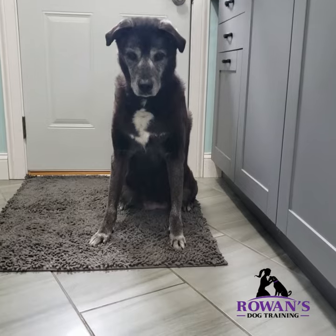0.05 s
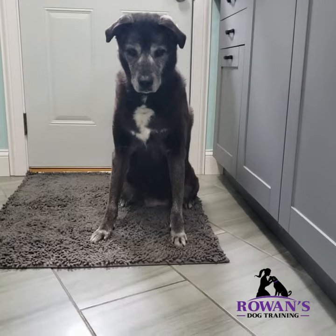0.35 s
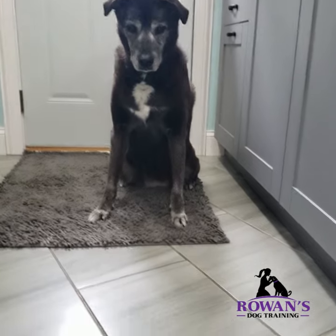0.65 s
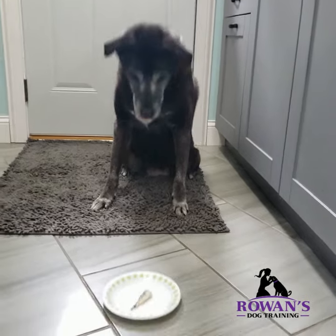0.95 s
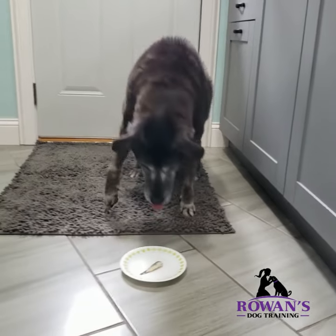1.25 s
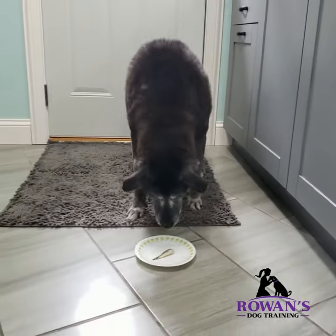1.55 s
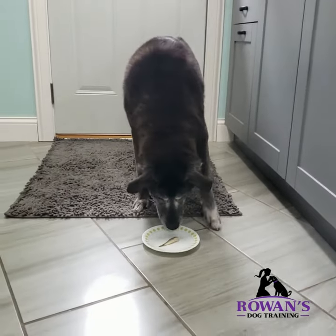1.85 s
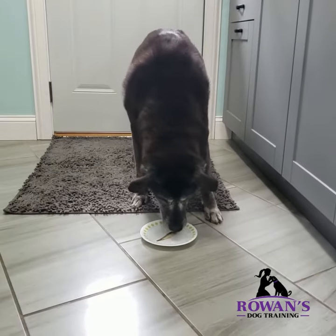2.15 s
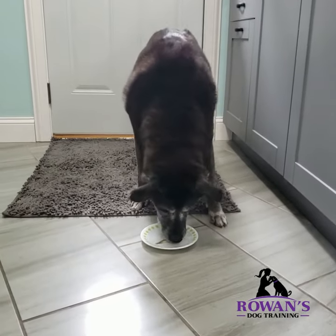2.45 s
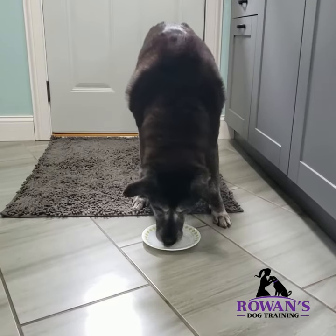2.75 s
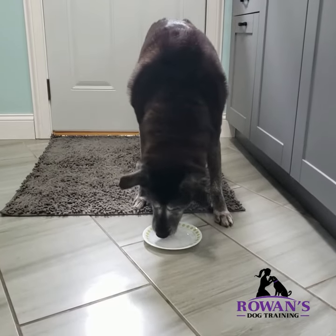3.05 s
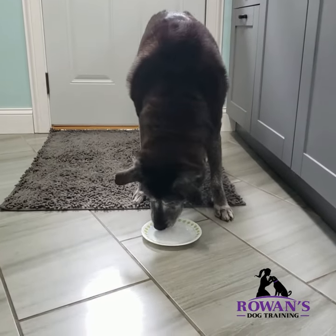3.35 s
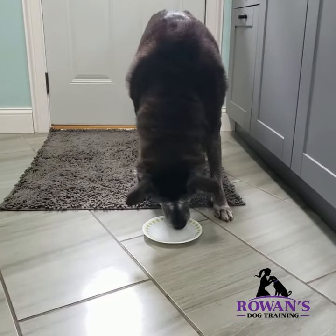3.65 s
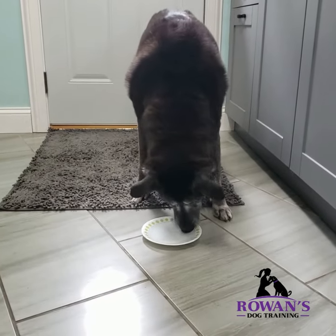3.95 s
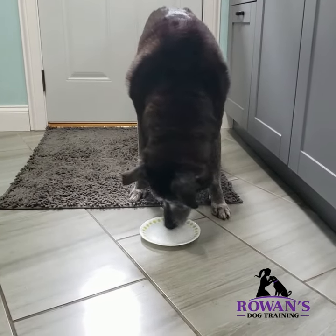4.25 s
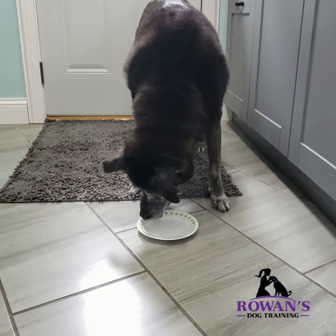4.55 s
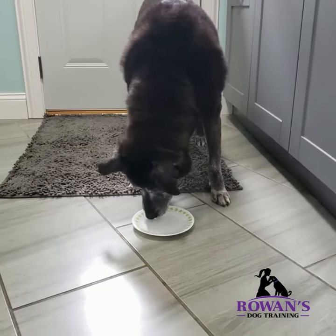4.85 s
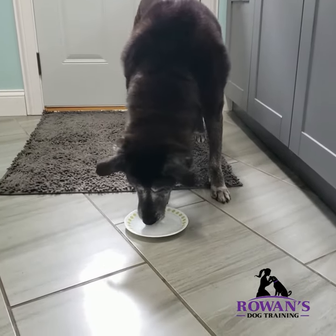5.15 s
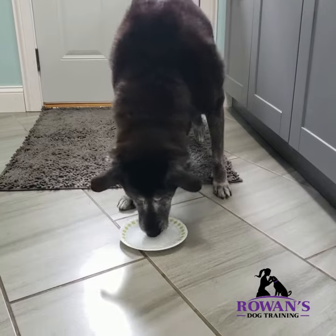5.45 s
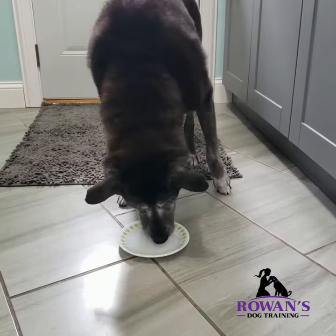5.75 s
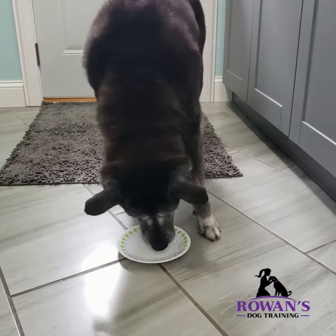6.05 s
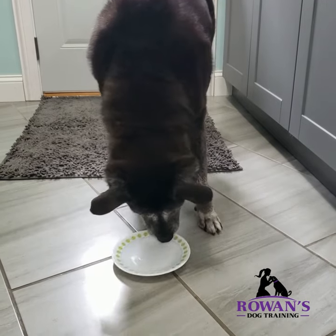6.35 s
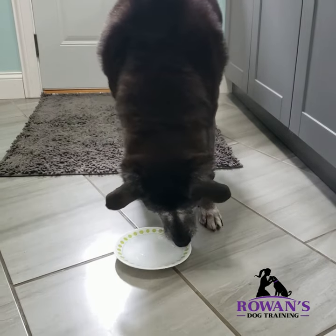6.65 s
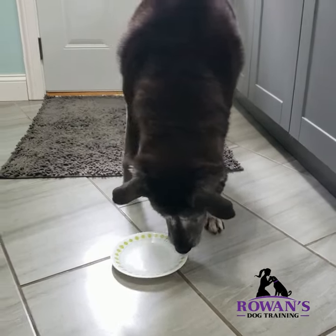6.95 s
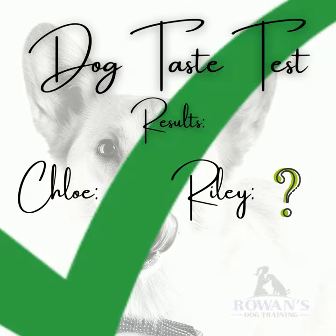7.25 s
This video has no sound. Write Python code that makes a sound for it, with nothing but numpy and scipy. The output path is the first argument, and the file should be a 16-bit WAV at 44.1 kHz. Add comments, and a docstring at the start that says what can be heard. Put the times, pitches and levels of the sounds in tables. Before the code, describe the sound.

A plate scrapes over tiles, rattles and rings briefly, followed by a dog quietly smacking and licking it until it knocks.

```python
"""A gritty scrape swells as a small, hard plate slides over a tiled kitchen floor. Stick-slip friction
makes it chatter; it strikes a grout line, rattles and rings in its modes until a dog's muzzle damps it.
The dog takes the food with soft smacks of its resonant mouth, shifts its paws and licks the plate,
shoving it along in short scrapes until it knocks. The hard room reverberates over a low rumble,
and the sound stops dead just after the last knock."""
import sys
import numpy as np
from scipy import signal
from scipy.fft import rfft, irfft, next_fast_len
from scipy.io import wavfile
from scipy.ndimage import uniform_filter1d, map_coordinates

SR = 44100
rng = np.random.default_rng(int(sys.argv[2]) if len(sys.argv) > 2 else 0)


def int16_out(signal):
    """Quantize to a 16-bit WAV file."""
    q = np.round(np.clip(np.atleast_2d(signal).T, -1, 1) * 32767)
    wavfile.write(sys.argv[1], SR, q.astype(np.int16))


N = 321048

# resonances of the plate against the floor: f/Hz, bandwidth/Hz, level/dB
CONTACT_RESONANCES = [(1330, 400, -6.5), (1610, 220, -3.5), (2093, 220, 2.5), (3170, 250, 4),
                      (3820, 270, -4.5), (5800, 400, -10)]
# spectra of the bright grit and of the dull clack: f/Hz, relative level/dB
GRIT_SPECTRUM = [(1500, -39), (4000, -16), (6000, -2.5), (7500, -0.5), (10000, -6.5), (12500, -1.5),
                 (16000, -2)]
CLACK_SPECTRUM = [(80, -32), (300, -18.5), (450, -13.5), (800, -18), (1500, -1), (2500, -15), (3800, -11),
                  (7000, -18.5), (16000, -52)]


def slide():
    """Sliding friction: hiss and floor drone grow as powers of the grinding, more slowly than it does."""
    reference_db = -34
    force = shove() / amp(reference_db)
    hiss, drone = amp(-1) * force ** 0.89, amp(-8) * force ** 0.57
    gain = amp(reference_db + 1.7 * wobble(70))
    return gain * friction(force, hiss, drone, rate=4000, spread_db=4.5)


def shove():
    """Amplitude envelope of the grinding while the plate slides."""
    grinding = [(.376, -73.5), (.47, -59.5), (.55, -40.5), (.64, -32.5), (.72, -40.5), (.84, -41.5),
                (.87, -30), (.97, -34), (1.005, -53), (1.085, -55.5)]  # course of the shove: t/s, level/dB
    times, db = np.transpose(grinding)
    t = clock()
    return (t > times[0]) * (t < times[-1]) * amp(np.interp(t, times, db))


def friction(scrape, hiss, drone, rate, spread_db):
    """Roughness noise: grit under the foot ring excites the plate, hisses and drones in the floor."""
    floor_spectrum = [(60, -36), (150, -10), (300, -8), (430, 0.5), (620, -8.5), (820, -2.5), (1100, -15),
                      (1800, -33.5), (5000, -77.5)]  # muffled rub in the floor: f/Hz, relative level/dB
    grit = grains(rate, spread_db)
    grind = unit(resonated(grit, CONTACT_RESONANCES) + amp(-3.5) * coloured(grit, CLACK_SPECTRUM))
    bright = coloured(grains(rate, spread_db), GRIT_SPECTRUM)
    muffled = coloured(grains(rate, spread_db), floor_spectrum)
    return scrape * grind + hiss * bright + drone * muffled


def chatter():
    """Stick-slip: at speed the foot ring slips unevenly and ever faster, and the plate squeals."""
    squeal_bands = [(1390, 560, 3.5), (1630, 430, 1), (2298, 630, -12.5), (3284, 150, 5), (5710, 150, -9),
                    (6750, 190, -5.5)]  # resonances that squeal: f/Hz, bandwidth/Hz, level/dB
    start_s, hold_s = .688, .148
    slip_hz = 72 + 260 * np.clip(clock() - start_s, 0, hold_s)
    slip_phase = np.cumsum(slip_hz * np.exp(0.33 * wobble(70))) / SR % 1
    slips = amp(-14 * slip_phase) * grains(9000, spread_db=2.0)
    squeal = np.zeros(N)
    for hz, width, db in squeal_bands:
        band = [(hz, width, 0)]
        squeal += amp(db) * resonated(resonated(slips, band), band)
    return amp(-26) * swell(start_s, hold_s, attack=.013, release=.012) * unit(squeal)


def knocks():
    """Impact excitation: each contact clacks and rings the modes anew; the rim cracks and rings most."""
    # plate knocks on tile, and one click of the dog's teeth: t/s, level/dB, contact (0 flat, 1 bare rim)
    impacts = [(.603, -32.5, 0.42), (.699, -23.5, 0.63), (.715, -19, 0.38), (0.8314, -29, 0.79),
               (.8527, -12.5, 0.86), (.8637, -13, 0.89), (0.8734, -13, 0.62), (.9085, -13, 0.4),
               (.92, -11, 0.59), (.93, -13.5, .1), (.949, -20.5, 0.48), (.959, -6.5, 0.18), (.978, -20, .5),
               (1.043, -14.5, .35), (1.058, -25.5, .4), (3.854, -37, 0), (6.293, -29, 0.098),
               (6.35, -27.5, 0), (6.886, -14.5, 0.11), (6.899, -33, .4), (6.934, -31, .3)]
    plate_modes = [(420.4, -22, 1.1), (591.5, -18.5, 0.43), (1240, -21, .7), (1649, -12, 0.37),
                   (2012, -1, 0.3), (2036, -13, 1.7), (2050, -6.5, .1), (3020, -8.5, 0.23),
                   (3140, -2, 0.13), (3290, -5, 0.079), (3627, -6, 0.073), (5710, -9.5, 0.15),
                   (7500, -5, 0.068), (8190, -10, 0.14), (9710, -15.5, 0.18), (12840, -10, 0.056),
                   (12870, -10, 0.062), (15770, -15.5, .06)]  # free vibration of the plate: f/Hz, level/dB, T60/s
    settle_s, rattle_db_per_s = 1.052, 51.5  # until the plate settles, rattling drains its ring
    muzzle_s, muzzle_db_per_s = 1.545, 90  # the muzzle lands and damps what still rings
    out, t = np.zeros(N), clock(2 * SR)
    short = t[:SR // 20]
    modes = np.array([amp(db) * decay(t, t60) * np.sin(2 * np.pi * hz * t) for hz, db, t60 in plate_modes])
    for start, db, rim in impacts:
        body_noise, clack_noise, crack_noise = rng.standard_normal((3, len(short)))
        body = resonated(body_noise, CONTACT_RESONANCES)
        clack = unit(body + amp(-4) * coloured(clack_noise, CLACK_SPECTRUM)) * decay(short, t60=0.021)
        crack = amp(-17 + 13.5 * rim) * coloured(crack_noise, GRIT_SPECTRUM) * decay(short, t60=.04)
        add(out, start, amp(db) * (clack + crack) * onset(short, tau=0.0002))
        ring = amp(-25 + 23 * rim + 2.4 * rng.standard_normal(len(modes))) @ modes
        damped_db = (start < muzzle_s) * muzzle_db_per_s * np.maximum(start + t - muzzle_s, 0)
        drained_db = rattle_db_per_s * np.minimum(t, max(settle_s - start, 0))
        add(out, start, amp(db - drained_db - damped_db) * ring)
    return out


def licks():
    """Forced vibration: the tongue drags the plate a little, and the friction keeps it humming."""
    hiss, scrape = strokes()
    rubbing = amp(2.36 * wobble(80)) * friction(scrape, hiss, drone=scrape, rate=3000, spread_db=1.5)
    hum = resonated(rubbing, [(1250, 2.6, 1.0), (1950, 2.0, -5.0)]) * np.std(rubbing)
    return shifting_colour(rubbing, depth_db=3.5) + amp(-24.0) * hum


def strokes():
    """Envelopes of the tongue's wet hiss and the plate's scrape: each stroke swells, sags and lets go."""
    # strokes of the tongue: t/s, rise/s, length/s, hiss level/dB, scrape relative to hiss/dB
    tongue_strokes = [(2.665, .02, .09, -78.5, -6.5), (3.314, 0.052, 0.16, -64.5, -1),
                      (3.602, 0.014, 0.048, -49, -2.5), (3.71, .02, 0.21, -57, -2),
                      (4.019, 0.024, .11, -53, -0.5), (4.215, .03, 0.077, -65, 2.5),
                      (4.297, 0.014, 0.15, -54, -2), (4.717, 0.044, 0.095, -55, -5.5),
                      (4.879, 0.052, .1, -48, 0), (4.983, 0.072, 0.19, -51, -3.5),
                      (5.297, 0.021, 0.073, -58.5, -6), (5.373, 0.018, 0.225, -45, 0),
                      (5.799, 0.046, 0.17, -43.5, -0.5), (6.081, .01, 0.044, -60, -3.5),
                      (6.2, 0.062, .2, -51, 8), (6.687, 0.013, 0.025, -49.5, 5),
                      (6.887, .01, 0.054, -43.5, 4.5)]
    hiss, scrape = np.zeros((2, N))
    for start, rise, length, db, drag_db in tongue_strokes:
        sag_db = 27.5 * np.clip(clock() - start, 0, 1)
        stroke = amp(db - sag_db) * swell(start, length, rise, release=0.01)
        hiss += stroke
        scrape += amp(drag_db) * stroke
    return hiss, scrape


def smacks():
    """Cavity resonance: wet lips part and ring the mouth, whose pitch glides as the jaw moves."""
    lip_pops = [(2.679, -47, 859, 2.5), (2.705, -58, 726, 6), (2.811, -64, 1410, 7), (3.1, -62, 1400, 4.5),
                (3.418, -37.5, 680, -2), (3.46, -52, 805, 4), (3.854, -37.5, 1650, -3),
                (3.862, -38.5, 736, 2), (3.905, -47, 810, -9), (3.931, -43, 847, 4), (4.251, -42, 590, -2),
                (4.315, -46, 755, 5), (4.325, -37.5, 505, -1.5), (4.355, -42, 1496, 3.5),
                (4.37, -41, 430, -1), (4.537, -52, 1044, -.5)]  # the mouth opens: t/s, level/dB, cavity f/Hz, glide/(octave/s)
    out, t = np.zeros(N), clock(SR // 8)
    for start, db, hz, glide in lip_pops:
        phase = 2 * np.pi * np.cumsum(hz * 2 ** (glide * t)) / SR
        flutter = resonated(rng.standard_normal(len(t)), [(58.3, 150, 0)])
        squelch = resonated(rng.standard_normal(len(t)), [(hz, .1 * hz, 0), (1.8 * hz, .5 * hz, -12)])
        cavity = unit(np.sin(phase + 0.59 * flutter) + amp(-6) * squelch)
        add(out, start, amp(db) * onset(t, tau=.003) * decay(t, t60=0.061) * cavity)
    return out


def ticks():
    """Broadband transients: bright little contacts, softened by spit and fur."""
    touches = [(.379, -49), (.438, -39.5), (1.963, -53), (3.612, -38), (4.217, -61), (4.313, -42),
               (4.645, -50), (5.132, -38.5), (5.38, -33.5), (6.09, -49), (6.7, -58)]  # the plate touching down, claws, teeth and tongue: t/s, level/dB
    spectrum = [(300, -20.5), (1500, -3.0), (3500, -2.5), (7000, -2.5), (16000, -2)]  # f/Hz, level/dB
    out, t = np.zeros(N), clock(SR // 12)
    for start, db in touches:
        tick = coloured(rng.standard_normal(len(t)), spectrum)
        add(out, start, amp(db) * onset(t, tau=0.00071) * decay(t, t60=0.033) * tick)
    return out


def steps():
    """Damped oscillation: the dog's weight thumps the floor at one low frequency per step."""
    footfalls = [(4.035, -33.5, 86.5), (4.159, -36, 77), (4.851, -38.5, 89), (5.171, -33.5, 80),
                 (6.973, -34, 118), (6.988, -35, 86.3)]  # soft paws: t/s, level/dB, f/Hz
    out, t = np.zeros(N), clock(SR // 4)
    for start, db, hz in footfalls:
        add(out, start, amp(db) * onset(t, tau=0.0043) * decay(t, t60=0.12) * np.sin(2 * np.pi * hz * t))
    return out


def room(x, wet_db):
    """Reverberation: direct sound plus the echo of tile and cupboards, changing as the source moves."""
    decay_times = [(100, 1), (500, 0.72), (2000, 0.44), (6000, 0.6), (12000, 0.68), (16000, 0.16)]  # reverberation time of the kitchen: f/Hz, T60/s
    out = np.array([x, x])
    hop, size = SR // 2, SR
    padded = np.pad(x, (hop, 2 * hop))
    window = np.sin(np.pi * np.arange(2 * hop) / (2 * hop))
    for start in range(0, N, hop):
        hz, t, noise = signal.stft(rng.standard_normal((2, size)), SR, nperseg=256)
        decaying = noise * decay(t, along(decay_times, hz)[:, None])
        tail = signal.istft(decaying, SR, nperseg=256)[1][:, :size]
        tail *= np.clip((clock(size) - .002) / 0.0036, 0, 1)  # the nearest walls answer a few ms late
        piece = padded[start:start + 2 * hop] * window
        echo = signal.fftconvolve(piece[None], tail / np.linalg.norm(tail[0]), axes=1)
        for side in range(2):
            add(out[side], max(start - hop, 0) / SR, amp(wet_db) * echo[side, max(hop - start, 0):])
    return out


def stereo_response(hz):
    """Transfer function of two microphone ports: rippled treble, unequal in level and in phase."""
    ripples = [(4000, -1.5), (4800, -1.5), (6700, 3.5), (7300, -5.5), (7700, -1), (8350, -12), (8800, 5),
               (9400, -5.5), (9900, 9), (10600, -7), (11350, -4.5), (12300, 5.5), (14000, -18), (15400, 0)]  # treble response of both ports: f/Hz, level/dB
    balance = [(60, -5), (200, 2), (500, 5.5), (1400, 6), (2100, 4), (3300, 9.5), (6500, 10.5), (9500, 6),
               (13000, 10)]  # left relative to right: f/Hz, level/dB
    left_lead = [(500, -0.5), (1000, -0.842), (1500, -1.1), (2100, -0.84), (3300, -0.95), (5500, -0.12),
                 (16000, -0.47)]  # lead of the left port: f/Hz, phase/rad
    half = np.array([[.5], [-.5]])
    gain = amp(along(ripples, hz) + half * along(balance, hz))
    return gain * np.exp(1j * half * along(left_lead, hz))


def background():
    """Structure-borne rumble of house, plate and moving bodies, summed in power; and a faint hiss."""
    bustle = [(-.3, 1.25, -50.5), (3.345, 3.7, -51)]  # bodies shift their weight on the floor: t/s, length/s, level/dB
    rumble_spectrum = [(20, -29.5), (38, -20), (52, -5.5), (75, 1), (95, -5), (115, 3), (140, -10.5),
                       (175, -2.5), (220, -16.5), (310, -16), (400, -23.5), (470, -20), (650, -33),
                       (1100, -58)]  # low rumble of the house: f/Hz, relative level/dB
    rumble_width = [(25, -5.5), (60, -13), (125, -18), (250, -12.5), (500, -5)]  # side relative to mid: f/Hz, level/dB
    hiss_spectrum = [(530, -37), (900, -5.5), (1280, -14.5), (2090, -15.5), (2360, -10.5), (5680, -33),
                     (13800, -24), (16000, -20)]  # steady hiss: f/Hz, relative level/dB
    _, scrape = strokes()
    bodies = [amp(db) * swell(start, length, attack=0.2, release=0.2) for start, length, db in bustle]
    house = amp(-56)
    causes = [house, amp(-9.5) * shove(), amp(-3) * scrape, *bodies]
    mid, side = coloured(rng.standard_normal((2, N)), rumble_spectrum)
    side = filtered(side, lambda hz: amp(along(rumble_width, hz)))
    rumble = np.sqrt(sum(cause ** 2 for cause in causes)) * np.array([mid + side, mid - side])
    return rumble + amp(-80.5) * coloured(rng.standard_normal((2, N)), hiss_spectrum)


def grains(rate, spread_db):
    """Shot noise: tiny contacts of random size, on average rate a second."""
    impulses = (rng.random(N) < rate / SR) * rng.standard_normal(N)
    return unit(impulses * amp(spread_db * np.clip(rng.standard_normal(N), -2, 2)))


def shifting_colour(x, depth_db):
    """Time-varying filter: the colour shifts at random as the contact point moves."""
    spectra = signal.stft(x, nperseg=512)[2]
    field = uniform_filter1d(rng.standard_normal(spectra.shape), size=7, axis=0)
    field = uniform_filter1d(field, size=16, axis=1)
    shifted = signal.istft(spectra * amp(depth_db * unit(field)), nperseg=512)[1][:N]
    return unit(shifted) * np.std(x)


def resonated(x, peaks):
    """Parallel resonators (f/Hz, bandwidth/Hz, level/dB) of alternating sign filter x; rms 1."""
    def response(f):
        return sum((-1) ** k * amp(db) * 1j * f * width / (hz * hz - f * f + 1j * f * width)
                   for k, (hz, width, db) in enumerate(peaks))
    return unit(filtered(x, response))


def coloured(x, spectrum):
    """Spectral shaping of x by (f/Hz, level/dB) points; rms 1."""
    return unit(filtered(x, lambda hz: amp(along(spectrum, hz))))


def filtered(x, response):
    """Linear filtering: the spectrum of x times a frequency response."""
    size = x.shape[-1]
    padded = next_fast_len(size + 8192)
    return irfft(rfft(x, padded) * response(np.fft.rfftfreq(padded, 1 / SR)), padded)[..., :size]


def swell(start, hold, attack, release):
    """Trapezoidal envelope that rises at start and falls hold seconds later."""
    t = clock() - start
    return np.clip(t / attack, 0, 1) * np.clip(1 - (t - hold) / release, 0, 1)


def onset(t, tau):
    """Exponential approach to 1 with time constant tau."""
    return 1 - np.exp(-t / tau)


def decay(t, t60):
    """Exponential decay by 60 dB in t60 seconds."""
    return amp(-60 * t / t60)


def wobble(rate):
    """Smooth random modulation, rate knots a second."""
    return map_coordinates(rng.standard_normal(4096), [clock() * rate], mode="wrap")


def add(track, start, sound):
    """Superpose a sound on a track at start seconds."""
    part = track[round(start * SR):][:len(sound)]
    part += sound[:len(part)]


def along(points, hz):
    """Interpolate (f/Hz, value) points on a logarithmic frequency axis."""
    f, values = np.transpose(points)
    return np.interp(np.log(hz + 1), np.log(f), values)


def amp(db):
    """Decibels to amplitude ratio."""
    return 10 ** (np.asarray(db) / 20)


def unit(x):
    """Scale to rms 1."""
    return x / np.sqrt(np.mean(x ** 2) + 1e-20)


def clock(size=N):
    """Sample times in seconds."""
    return np.arange(size) / SR


def scene():
    """Superposition: plate and dog in the hard room, louder on the left, over footfalls and rumble."""
    sources = slide() + chatter() + licks() + knocks() + smacks() + ticks()
    reverberant = amp(-3.0) * room(sources, wet_db=-1.0)
    return filtered(reverberant, stereo_response) + steps() + background()


def record(dry):
    """Soft clipping rounds the peaks; the level dips before the hard rattle, and the sound stops dead."""
    stop_s, cutoff_hz = 7.021, 15850
    rounded = dry / (1 + np.abs(dry / .8) ** 4) ** (1 / 4)
    dip_db = np.interp(clock(), [.842, .846, .851, .8527], [0, -15, -15, 0])
    gate = np.clip((stop_s - clock()) / .003, 0, 1)
    return filtered(rounded * amp(dip_db) * gate, lambda hz: 1 / (1 + (hz / cutoff_hz) ** 200))


dry = scene()
out = record(dry)
int16_out(out)
```